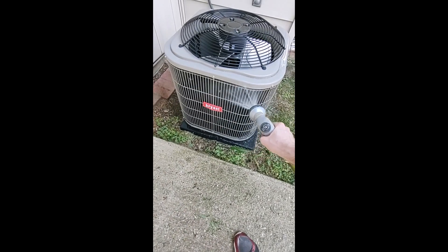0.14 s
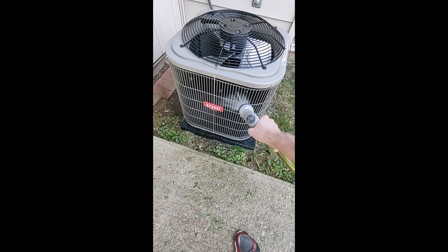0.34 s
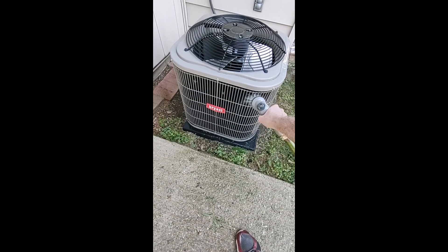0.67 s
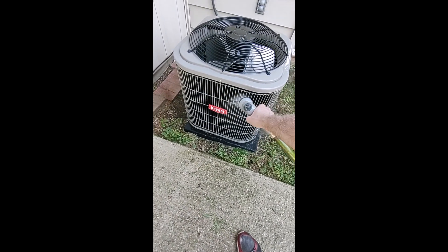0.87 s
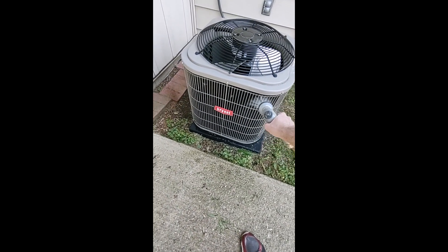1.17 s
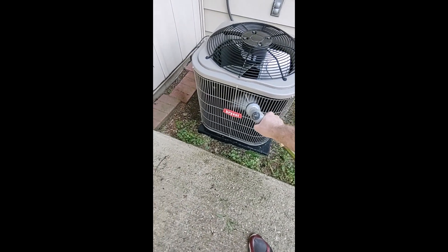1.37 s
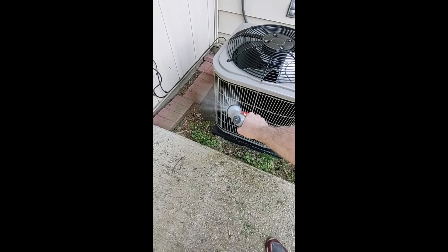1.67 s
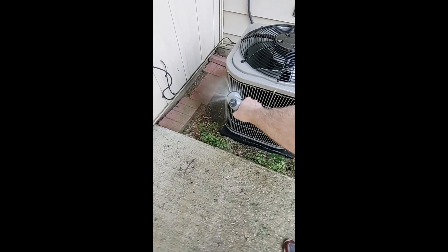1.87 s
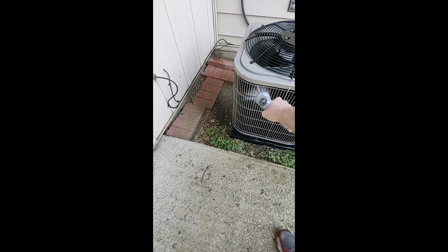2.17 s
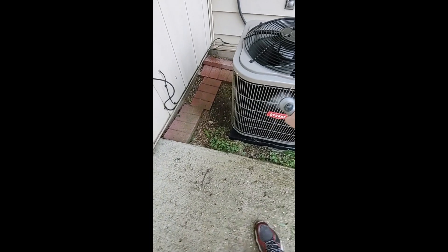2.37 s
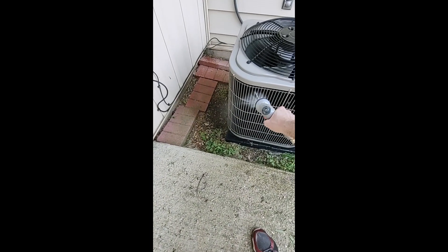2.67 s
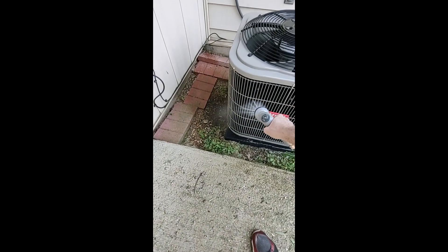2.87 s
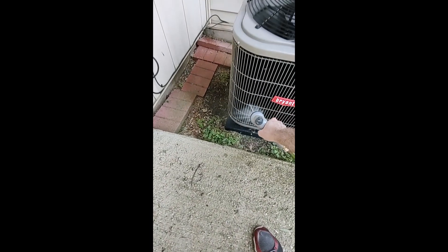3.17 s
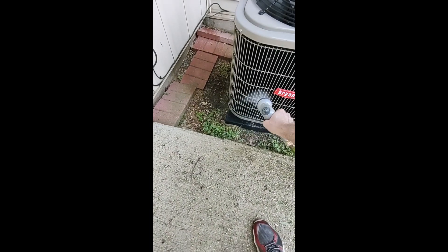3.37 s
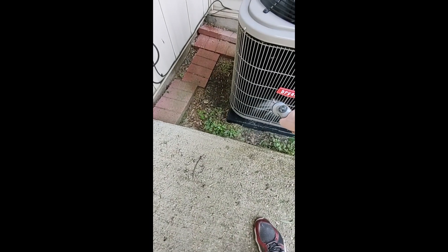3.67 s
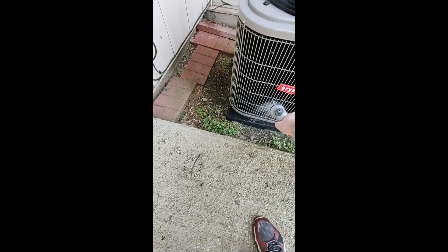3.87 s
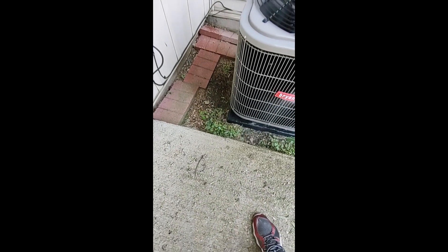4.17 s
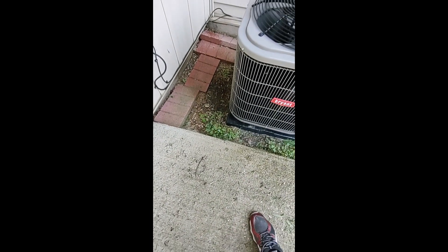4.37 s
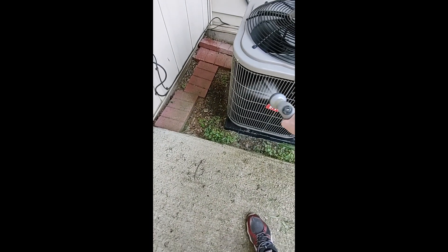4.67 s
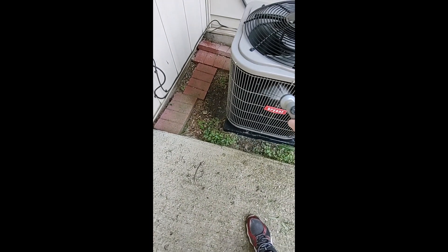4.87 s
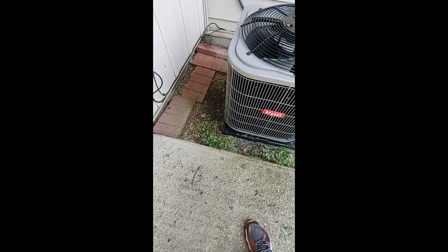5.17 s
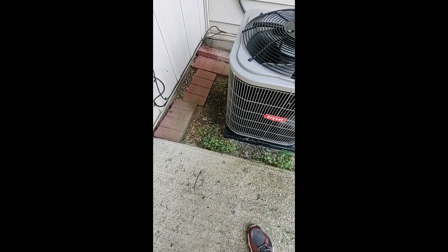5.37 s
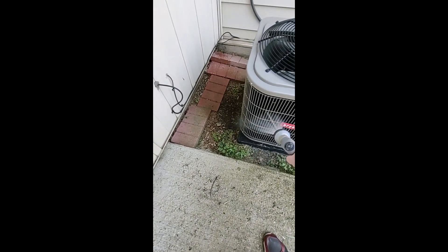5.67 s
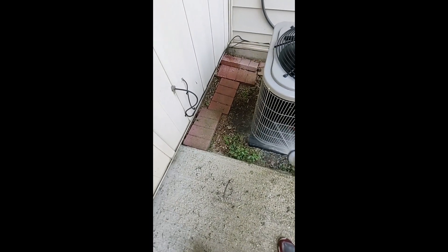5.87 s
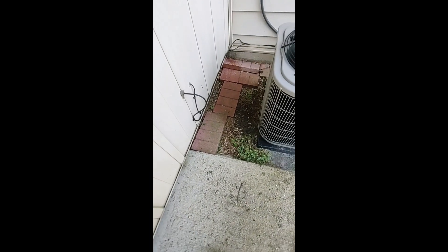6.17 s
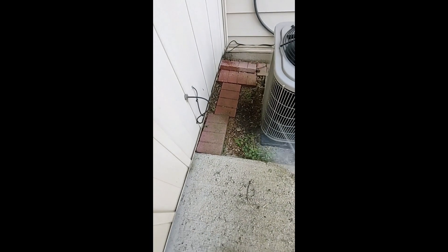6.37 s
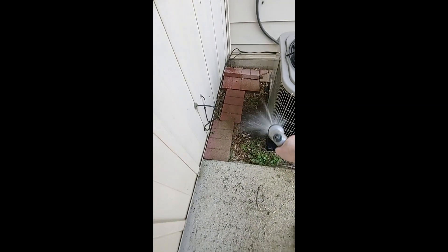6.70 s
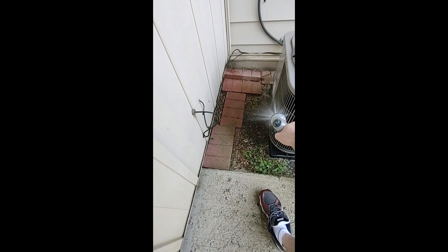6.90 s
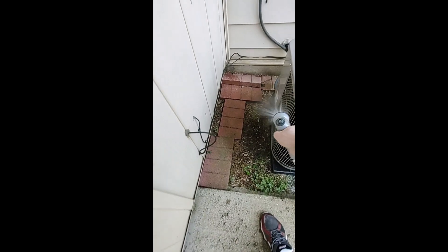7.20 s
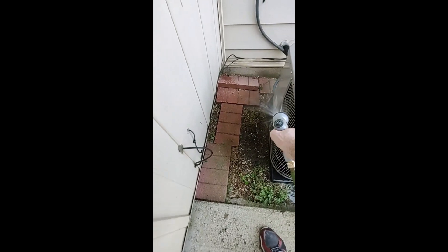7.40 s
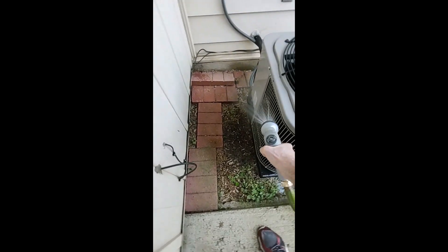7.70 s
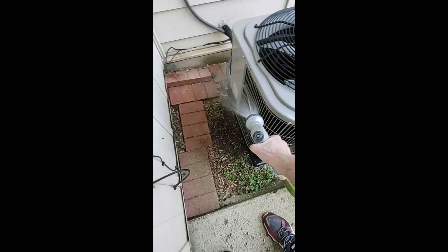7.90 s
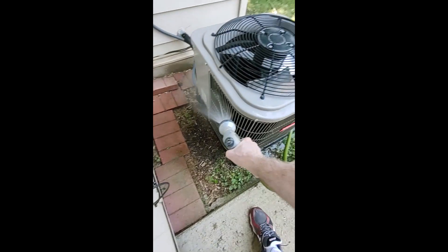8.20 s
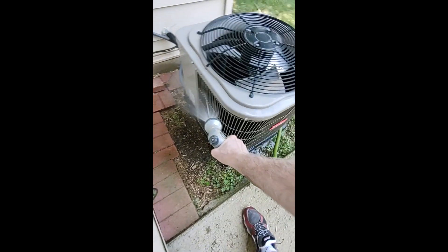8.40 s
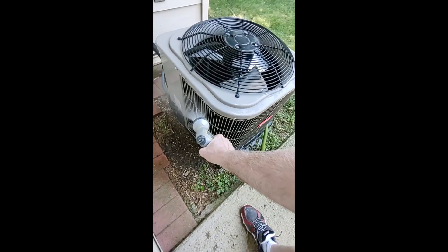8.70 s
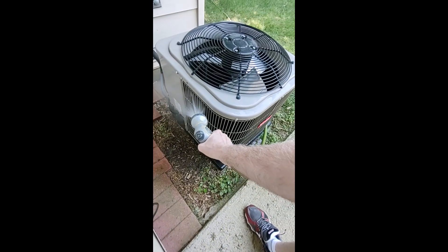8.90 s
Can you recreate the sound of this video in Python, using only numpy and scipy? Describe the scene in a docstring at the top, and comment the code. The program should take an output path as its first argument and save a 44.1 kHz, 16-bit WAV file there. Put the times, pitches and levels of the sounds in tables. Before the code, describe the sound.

Fine pressurized water sizzles against a finned outdoor unit without stopping, its loudness and tone shifting as the nozzle sweeps. Wetter splatter swells around four seconds. Shortly before seven seconds water hits sheet metal with a quick hollow rattle that fades into run-off; muffled bumps come soon after, then the spray builds again. Open yard, near microphones, wide stereo, quiet distant low rumble, no fan motor.

```python
"""A garden hose sprays the finned coil of an outdoor air conditioner, heard at two hand-held microphone ports.
From the start fine droplets hiss in the fins and heavier water splatters on the wire guard (shaped noise
with drop flutter), over a low yard rumble (lumpy low noise). Near 2 s the splash dips slightly for a moment,
then soft bumps fall (damped sines). Near 7 s the jet drums on a sheet-metal corner panel (slugs into
resonances) and leaves run-off; the splash dips slightly again and a last group of bumps follows."""
import sys
import numpy as np
from scipy import signal
from scipy.io import wavfile
from scipy.ndimage import uniform_filter1d

SR = 44100
rng = np.random.default_rng(int(sys.argv[2]) if len(sys.argv) > 2 else 0)


def wav_out(sig):
    """Save sig, one row per channel (or a flat mono array), as 16-bit PCM at SR to the path in sys.argv[1]."""
    wavfile.write(sys.argv[1], SR, np.round(np.clip(np.atleast_2d(sig).T, -1, 1) * 32767).astype(np.int16))


N = 399105
SIZE, HOP = 1024, 256  # short-time spectra, samples

# Where the spray is heard from. Each row: time in seconds, lag of the left port in samples,
# left minus right of the hiss in dB, narrow-band level at the left port in dB (minus is a shadow).
BEARING = [(0, 6.5, 1, -22), (1.7, 4.5, 0.5, -18), (2.2, 4.5, 0, 1), (3.3, 8, 0, -13), (4.8, 7, 1, -14),
           (5.7, 3, 1, -14), (6.3, -1.5, 2, -12), (6.8, 5.5, 1.5, -3), (7.3, 2.5, -0.5, -6),
           (8, 6.5, 1, -2), (9.05, 3, 3.5, -3)]


def amp(db):
    """Decibels to gain."""
    return 10 ** (np.asarray(db) / 20)


def evened(x):
    """Scales to unit rms."""
    return x / np.sqrt(np.mean(np.abs(x) ** 2) + 1e-20)


def read(points, hz):
    """A spectrum interpolated on a log-frequency axis."""
    point_hz, value = np.transpose(points)
    return np.interp(np.log(hz + 1), np.log(point_hz + 1), value)


def columns(rows, t):
    """The columns of a control table at times t."""
    s, *rest = np.transpose(rows)
    return [np.interp(t, s, column) for column in rest]


def grid():
    """Frame times (s) and bin frequencies (Hz) of the short-time spectra."""
    frame_s = np.arange(N // HOP + 5) * HOP / SR
    bin_hz = np.fft.rfftfreq(SIZE, 1 / SR)[:, None]
    return frame_s, bin_hz


def patches(seconds, hz):
    """A smooth random field over time and frequency, unit rms."""
    t, f = grid()
    frames = max(1, round(seconds * SR / HOP))
    bins = max(1, round(hz * SIZE / SR))
    field = rng.standard_normal((len(t), len(f))).T
    for _ in range(2):
        field = uniform_filter1d(field, size=frames, axis=1)
        field = uniform_filter1d(field, size=bins, axis=0)
    return evened(field)


def spread_noise(shape_db, level_db, pan_db=0):
    """Noise from a wide source: partly alike at the ports, delayed by direction, shaded by the body."""
    # Each row: frequency in Hz, likeness of the ports from 0 to 1.
    likeness = [(60, 0.2), (200, 0.64), (700, 0.29), (1600, 0.3), (2500, 0.18), (8000, 0.12), (15000, 0.03)]
    # Shading by the hand-held body. Each row: frequency in Hz, left minus right in dB.
    balance_db = [(60, -3), (92, -7), (140, -11), (210, -7), (330, 3.5), (500, -6.5), (770, -2.5),
                  (1170, 2.5), (1790, 2), (2740, 0), (4190, -1.5), (6410, 0), (9810, -4.5), (15000, -0.5)]
    t, f = grid()
    a, b, c, d = rng.standard_normal((len(t), len(f), 4)).T
    alike = np.clip(read(likeness, f), 0, 1)
    lag_samples = columns(BEARING, t)[0]
    late = np.exp(-2j * np.pi * f * lag_samples / SR)
    right = a + 1j * b
    left = alike * late * right + np.sqrt(1 - alike ** 2) * (c + 1j * d)
    lean = amp((read(balance_db, f) + pan_db) / 2)
    spectra = np.array([left * lean, right / lean]) * amp(shape_db)
    out = signal.istft(spectra, nperseg=SIZE, noverlap=SIZE - HOP)[1][:, :N]
    return out / np.std(out.mean(axis=0)) * amp(level_db)


def drops(per_s, spread_db, seconds):
    """Loudness flutter from drops of uneven size landing at random, each a short dying puff."""
    size = amp(spread_db * np.minimum(rng.exponential(1, N), 5))
    size = size * (rng.random(N) < per_s / SR)
    power = signal.lfilter([1], [1, -np.exp(-1 / (seconds * SR))], size ** 2)
    return evened(np.sqrt(power + 1e-9))


def ring(x, modes):
    """Sum of resonances of sheet metal driven by x, neighbours in opposite phase."""
    out = 0
    for k, (hz, width_hz, db) in enumerate(modes):
        r, w = np.exp(-np.pi * width_hz / SR), 2 * np.pi * hz / SR
        mode = signal.lfilter([1, 0, -r], [1, -2 * r * np.cos(w), r * r], x)
        out = out + (-1) ** k * amp(db) * mode * np.sqrt(width_hz)
    return out


def rumble():
    """Far traffic and moving air: low noise in short narrow lumps that come and go."""
    # Each row: time in seconds, level in dB.
    level_rows = [(0, -62), (0.5, -64.5), (1.3, -67.5), (2.3, -61), (3, -60.5), (3.5, -58.5), (4.5, -56.5),
                  (6.5, -56), (7.0, -50.5), (7.35, -50), (7.8, -55), (8.3, -53), (9.05, -56)]
    # Each row: frequency in Hz, relative density in dB.
    yard_colour = [(15, -41), (25, -16), (65, 4.5), (118, 3.5), (146, -2.5), (200, -16), (320, -16),
                   (500, -2), (650, -64), (1100, -120)]
    hz = np.fft.rfftfreq(4096, 1 / SR)[:120, None]
    a, b, c, d, lumps = rng.standard_normal((N // 1024 + 5, len(hz), 5)).T
    lumps = uniform_filter1d(lumps, size=5, axis=1)
    lumps = evened(uniform_filter1d(lumps, size=2, axis=0))
    common, apart = a + 1j * b, c + 1j * d
    ports = np.array([common + 0.56 * apart, common - 0.43 * apart])
    ports = ports * amp(read(yard_colour, hz) + 4.6 * lumps)
    ports = np.pad(ports, ((0, 0), (0, 2049 - len(hz)), (0, 0)))
    out = signal.istft(ports, nperseg=4096, noverlap=3072)[1][:, :N]
    return evened(out) * amp(columns(level_rows, np.arange(N) / SR)[0])


def bumps():
    """Soft dull knocks, perhaps shoes or the hose on concrete: quickly damped swings, sagging in pitch."""
    # Each row: start in seconds, level in dB before onset and port gain, nominal pitch in Hz,
    # 60 dB decay in seconds.
    knocks = [(2.379, -24.5, 434, 0.014), (2.386, -35, 280, .025), (3.52, -42, 103, 0.059),
              (7.579, -32, 109.5, 0.032), (7.674, -29, 183, 0.027), (7.7, -34, 156, 0.028),
              (7.759, -32, 81, .03)]
    out, t = np.zeros(N), np.arange(round(0.2 * SR)) / SR
    for s, db, hz, t60 in knocks:
        part = out[round(s * SR):][:len(t)]
        sag = 0.84 + 0.32 * np.exp(-t * hz * 0.27)
        onset = 1 - np.exp(-t * hz * 3.4)
        part += amp(db - 60 * t / t60) * np.sin(2 * np.pi * hz * t * sag) * onset
    return out * amp([[0.5], [-0.5]])


def drumming(t):
    """Force on the panel and on its upper modes: surges that fade and soften, over the run-off."""
    # Surges of the jet. Each row: start in seconds, force in dB before fade,
    # upper-mode drive relative to force in dB before softening.
    surge_rows = [(6.75, -32.5, -1.5), (6.78, -39.5, -17), (6.81, -43, -14), (6.86, -39, -13),
                  (6.94, -44, -7), (6.975, -54, 2.5), (7.67, -46.5, -26)]
    rise_s, fade_db_per_s, soften_db_per_s = 0.0087, 128, 126
    # water left running down the panel: a fading part and a steady part
    runoff_db, runoff_fade_db_per_s, runoff_rest_db, runoff_hard_db = -55, 30, -55, -7.5
    since = np.maximum(t - surge_rows[0][0], 0)
    runoff = amp(runoff_db - runoff_fade_db_per_s * since) + amp(runoff_rest_db)
    force = (since > 0) * runoff
    upper = force * amp(runoff_hard_db)
    for s, db, hard_db in surge_rows:
        since = np.maximum(t - s, 0)
        surge = np.minimum(since / rise_s, 1) * amp(db - fade_db_per_s * since)
        force = force + surge
        upper = upper + surge * amp(hard_db - soften_db_per_s * since)
    return force, upper


def panel():
    """Slugs of water beat the corner panel; a square hit also wakes its upper modes."""
    # Both tables, each row: mode frequency in Hz, width in Hz, relative level in dB.
    lower_modes = [(105, 15, -11.5), (166, 13, -6.5), (235, 31, -2), (282, 33, -4.5), (322, 37, -7),
                   (371, 42, -6), (453, 125, -5.5), (581, 37, -9.5)]
    upper_modes = [(890, 280, 0.5), (1270, 90, 0.5), (1533, 69, 1), (1840, 130, 1), (2200, 700, -6)]
    force, upper = drumming(np.arange(N) / SR)
    slugs = amp(1.1 * np.minimum(rng.exponential(1, (N, 2)), 5))
    slugs = slugs * (rng.random((N, 2)) < 3000 / SR)  # 3000 per second
    common, apart = (slugs * rng.standard_normal((N, 2))).T
    slugs = np.array([common + 0.25 * apart, common - 0.35 * apart])
    sound = ring(slugs * force, lower_modes) + ring(slugs * upper, upper_modes)
    # a panel this small radiates no deep bass
    sound = signal.sosfilt(signal.butter(3, 85, "high", fs=SR, output="sos"), sound)
    # slug strength to sound at each port; the panel lies to the left
    return sound * amp([[-29.5], [-33]])


def slaps(t):
    """Swells in dB as the fan crosses something solid: each rises to its peak and falls away."""
    # Each row: peak time in seconds, swell in dB, rise in seconds, fall in seconds.
    swells = [(0.22, 7, 0.046, 0.16), (3.7, 4.5, 0.15, 0.084), (4.23, 4, 0.09, 0.36),
              (6.779, 8, 0.044, 0.14), (7.0, 6, 0.068, 0.05)]
    return sum(np.interp(t, [s - rise, s, s + fall], [0, db, 0]) for s, db, rise, fall in swells)


def splatter(colour_db):
    """Coarser water slapping the guard wires and dripping inside the housing."""
    # Each row: time in seconds, level in dB, weight as downward tilt in dB per octave.
    splatter_rows = [(0.0, -41, 2), (0.5, -42, 2.5), (1.18, -43, 2), (1.9, -46, 4.5), (2.2, -46.5, 3),
                     (2.47, -42.5, 2.5), (3.48, -40, 0.5), (3.7, -35, 0), (4.11, -35.5, 1),
                     (4.91, -42, 0.5), (6.02, -42, -0.5), (6.32, -39, 0.5), (7.05, -44, 5), (7.36, -44, -1),
                     (7.56, -43.5, 0.5), (8.17, -39.5, 1), (9.05, -37.5, -1)]
    # Each row: frequency in Hz, relative density in dB.
    guard_colour = [(120, -58), (200, -28), (281, -15.5), (379, -24), (463, -20), (773, -12), (879, -11),
                    (1070, -7), (1670, -5.5), (1950, -3.5), (2180, -6), (6000, -4), (7800, -17),
                    (13200, -120)]
    slap_hz, slap_width_hz, slap_share = 3920, 1300, 0.65  # a swell is strongest in this band
    t, f = grid()
    tilt = -columns(splatter_rows, t)[1] * np.log2(np.clip(f, 250, 7000) / 1500)
    tilt = tilt + slap_share * slaps(t) * np.exp(-((f - slap_hz) / slap_width_hz) ** 2)
    drift = 1.04 * patches(0.07, 300) + 0.5 * patches(0.05, 1200)
    now = np.arange(N) / SR
    level_db = columns(splatter_rows, now)[0] + slaps(now)
    noise = spread_noise(read(guard_colour, f) + tilt + drift + colour_db, level_db)
    return noise * drops(3000, 0.9, 0.008)


def colouring():
    """The dB field of colours that hiss and splatter pass through, one for each port."""
    # Narrow drifting bands where the splash is stronger or weaker. Each row: start in seconds,
    # end in seconds, frequency at start in Hz, frequency at end in Hz, width in Hz, level in dB.
    drifting_bands = [(1, 1.46, 1180, 1370, 64, 5), (3, 0.89, 710, 740, 87, 0),
                      (0, 0.76, 235, 220, 45, 5.5), (0, 0.68, 3300, 3600, 210, -2),
                      (0.25, 1.34, 5100, 4900, 290, 5), (0.9, 3, 5000, 4640, 380, 3.5),
                      (-0.3, 5.7, 3315, 3340, 99, -9.5), (2.5, 4.05, 2620, 2100, 310, -5),
                      (3, 4.5, 1170, 1400, 260, 2.5), (5, 5.8, 3600, 3630, 320, 3.5),
                      (6.1, 6.7, 4100, 5500, 1200, 2.5), (6, 6.6, 3700, 3600, 440, 2),
                      (4, 9.6, 2300, 2030, 380, -3), (7.1, 7.6, 4070, 4250, 210, -10),
                      (8.4, 9.6, 1560, 1670, 180, 6.5), (7, 10.3, 850, 820, 150, 5),
                      (8, 9.6, 1040, 1230, 170, -6.5), (7.5, 9.6, 2470, 2600, 280, 5.5),
                      (7, 8.1, 5360, 6000, 310, -5), (0, 1.06, 5800, 7500, 550, 1),
                      (0.7, 0.88, 310, 210, 95, -11), (2.5, 4.8, 300, 290, 51, 5),
                      (5, 7.2, 390, 277, 62, -5), (1.5, 4.1, 5100, 5800, 520, 1),
                      (3, 4.4, 3600, 3400, 690, 1), (3, 4.1, 1840, 1800, 250, -1.5),
                      (3.3, 4.7, 920, 910, 76, -4), (7, 8.66, 1700, 1700, 270, 2.5),
                      (5.5, 6.1, 4500, 4900, 610, -3.5), (7, 7.83, 890, 790, 180, -6.5),
                      (7.5, 11.5, 530, 520, 80, -9), (0, 1.7, 2600, 2750, 280, -4),
                      (2, 3.2, 270, 310, 80, -5.5), (2, 4.75, 160, 210, 52, -10),
                      (1.5, 2.4, 5700, 5400, 450, -4.5), (1.8, 2.4, 3400, 3700, 350, -4),
                      (6.5, 7.75, 5000, 4850, 390, -6.5), (7, 7.87, 3800, 3330, 240, -7),
                      (8, 9.6, 4600, 4200, 480, 2.5), (5, 6.9, 350, 430, 90, -3.5),
                      (0, 1.1, 315, 370, 45, -6), (4, 3.7, 2200, 2000, 410, -1)]
    # Short dips below the treble. Each row: start in seconds, end in seconds, level in dB.
    short_dips = [(2.046, 2.15, -4), (7.373, 7.52, -4)]
    dip_edge_s, dip_top_hz = 0.03, 6540  # a dip fades out above its top
    shadow_hz, shadow_width_hz = 2610, 137
    t, f = grid()
    field = 0.8 * np.exp(-f / 9000) * patches(0.25, 110)
    field = field + 3.4 * np.exp(-f / 3000) * patches(0.11, 60)
    # the low splash comes in thin uneven lumps
    field = field + 5 * np.exp(-f / 450) * patches(0.052, 45)
    # fine random unevenness of tone, strongest near 4 kHz
    field = field + 1.88 * np.exp(-((f - 4000) / 5000) ** 2) * patches(0.04, 45)
    for start, end, hz0, hz1, width_hz, db in drifting_bands:
        present = np.clip(np.minimum(t - start, end - t) / 0.24 + 0.5, 0, 1)
        centre_hz = np.interp(t, [start, end], [hz0, hz1])
        field = field + db * present * np.exp(-((f - centre_hz) / width_hz) ** 2)
    for start, end, db in short_dips:
        present = np.clip(np.minimum(t - start, end - t) / dip_edge_s + 0.5, 0, 1)
        field = field + db * present / (1 + (f / dip_top_hz) ** 4)
    shadow = columns(BEARING, t)[2] * np.exp(-((f - shadow_hz) / shadow_width_hz) ** 2)
    # each port has its own slow random colouring, weaker in the treble
    own_db = 1.7 * np.exp(-f / 14000)
    left = field + shadow + own_db * patches(0.2, 80)
    right = field + own_db * patches(0.19, 80)
    return np.array([left, right])


def hiss(colour_db):
    """Countless droplets breaking in the fins; the colour drifts as the fan sweeps and turns."""
    # Each row: time in seconds, level in dB, fineness as tilt in dB per octave.
    spray_rows = [(0.0, -26, 1), (0.15, -28, -1), (0.2, -25, 1.5), (0.5, -26.5, 1), (0.83, -23.5, 1),
                  (1.06, -26, 1), (1.16, -22.5, 2), (1.34, -23.5, -0.5), (1.56, -29, 0.5), (2.09, -34, 3),
                  (2.52, -28, 2.5), (2.72, -28.5, 3), (2.97, -23, 2.5), (3.35, -25.5, 0), (3.48, -21.5, 0),
                  (4.16, -22.5, 1), (4.64, -27.5, 2), (5.67, -25.5, 1), (5.85, -30.5, 2.5), (6.25, -25, 1),
                  (6.45, -25, -0.5), (6.91, -32.5, 1.5), (7.11, -29.5, 0), (7.41, -32.5, 2),
                  (8.75, -24, 3.5), (9.05, -24, 3)]
    # Each row: frequency in Hz, relative density in dB.
    hiss_colour = [(150, -45), (500, -31), (1470, -26.5), (2500, -10), (2960, -13), (3380, -7.5),
                   (3650, -11.5), (5410, -7), (7650, 0.5), (10700, -2), (12800, -2.5), (15100, -4.5),
                   (15800, -15)]
    # Brightest band. Each row: time in seconds, centre in Hz, boost in dB.
    bright_rows = [(0, 12000, 2.5), (1.4, 11900, 3.5), (2, 11400, 0.5), (2.75, 11880, 2.5), (3.1, 12000, 1),
                   (4.2, 13100, 1), (5.3, 12900, 4), (5.9, 12800, 4.5), (6.5, 11100, 1), (7.5, 9900, 1.5),
                   (9.05, 11900, -0.5)]
    t, f = grid()
    fine_db = columns(spray_rows, t)[1]
    bright_hz, bright_db = columns(bright_rows, t)
    tilt = fine_db * np.log2(np.maximum(f, 2000) / 9000)
    hump = bright_db * np.exp(-((f - bright_hz) / 1200) ** 2)
    drift = 0.9 * patches(0.4, 600) + 0.5 * patches(0.05, 1500) + 0.5 * patches(0.04, 6000)
    level_db = columns(spray_rows, np.arange(N) / SR)[0]
    shape_db = read(hiss_colour, f) + tilt + hump + drift + colour_db
    noise = spread_noise(shape_db, level_db, columns(BEARING, t)[1])
    return noise * drops(12000, 1.0, 0.0014)


def scene():
    """All sources at the two microphone ports."""
    colour_db = colouring()
    return rumble() + bumps() + panel() + splatter(colour_db) + hiss(colour_db)


def record(dry):
    """Upper band limit at the microphones: a steep linear-phase low-pass at 15830 Hz."""
    low_pass = signal.firwin(1023, 15830, window=("kaiser", 9), fs=SR)
    return signal.oaconvolve(dry, low_pass[None], "same")


dry = scene()
out = record(dry)
wav_out(out)
```